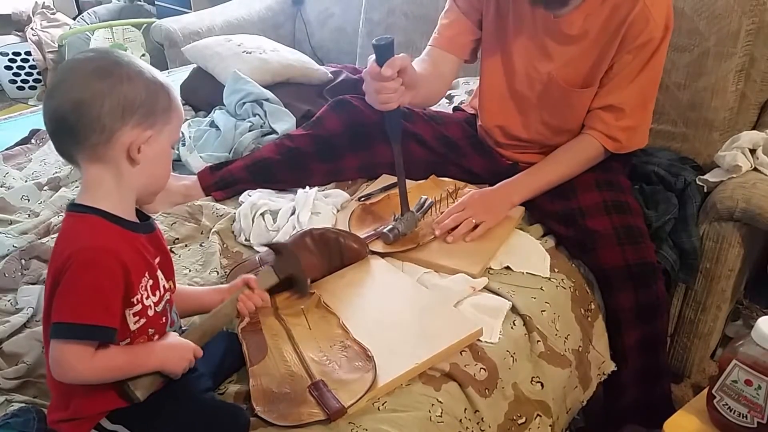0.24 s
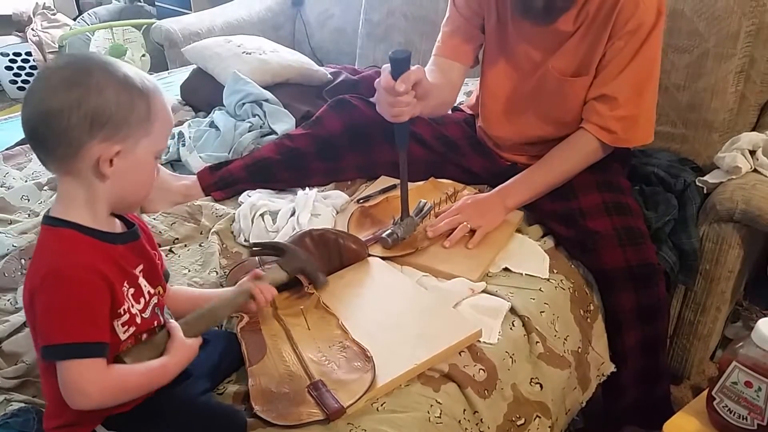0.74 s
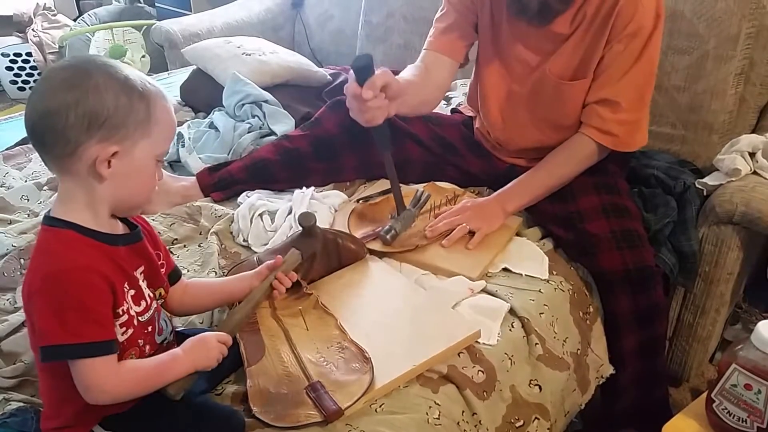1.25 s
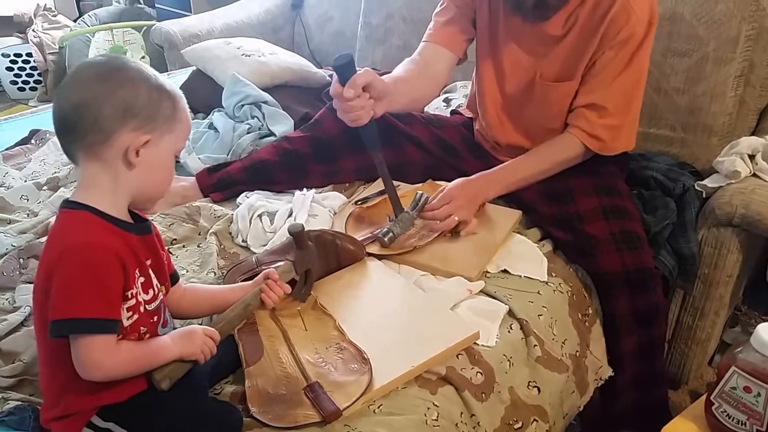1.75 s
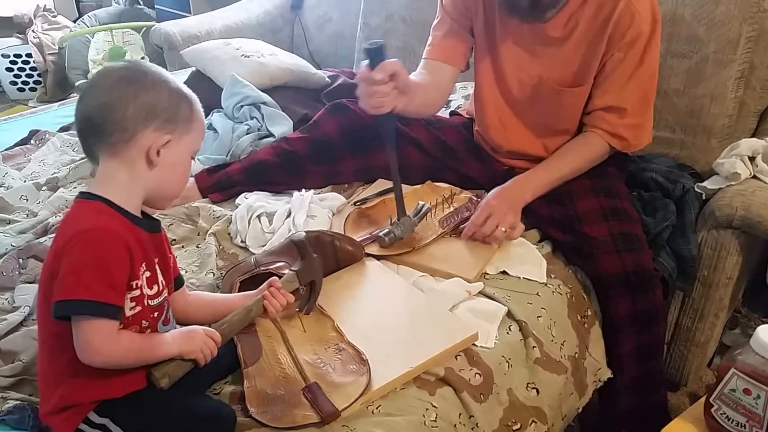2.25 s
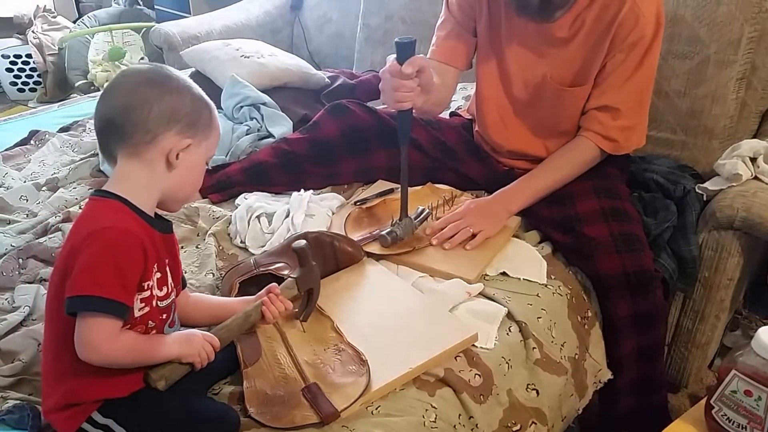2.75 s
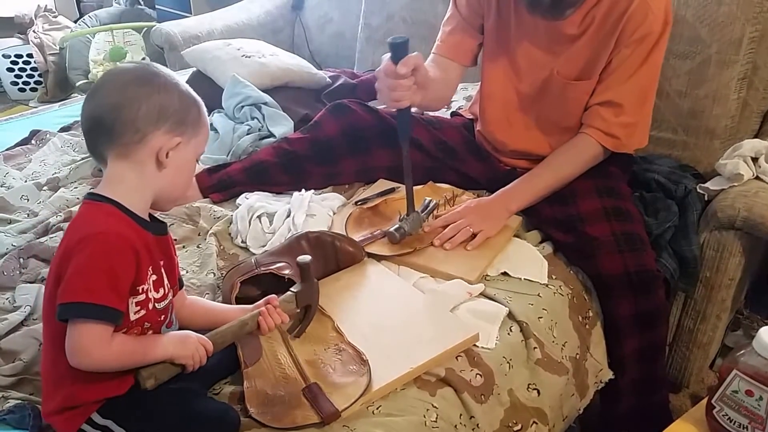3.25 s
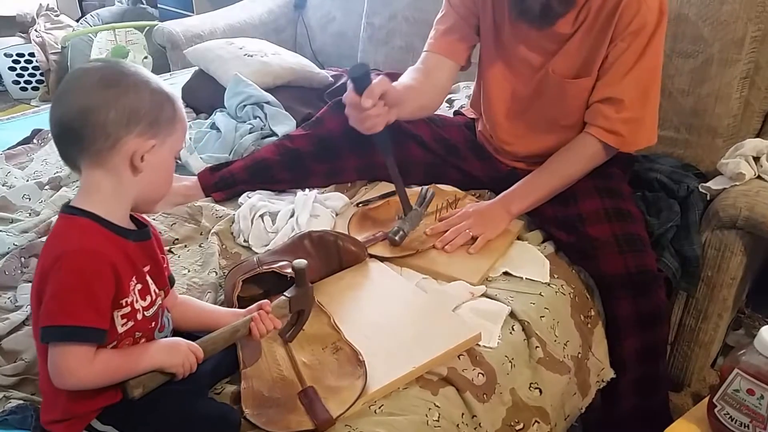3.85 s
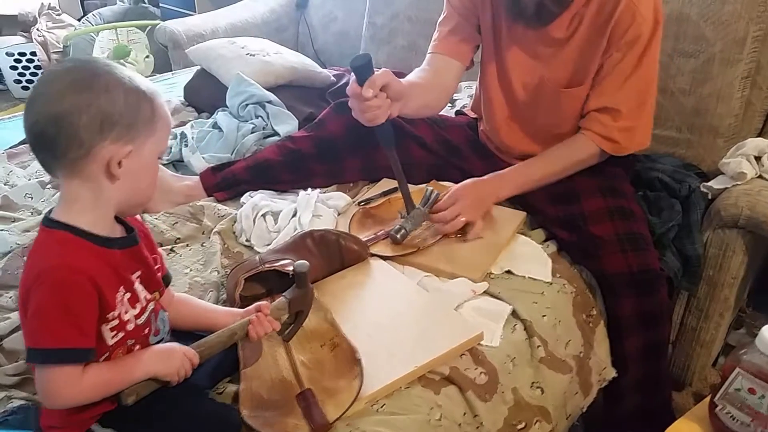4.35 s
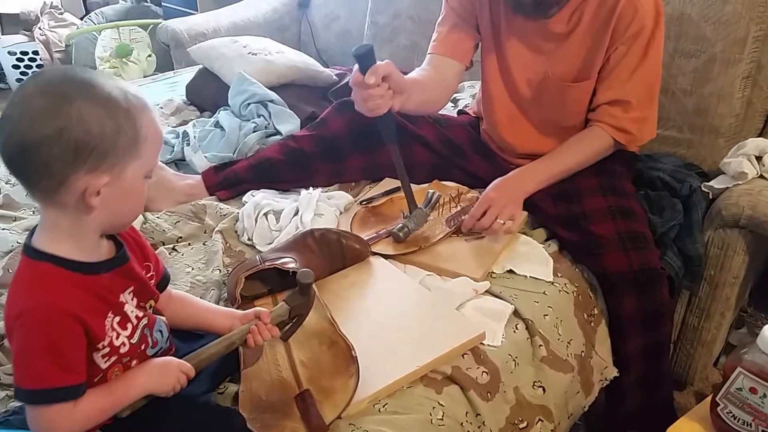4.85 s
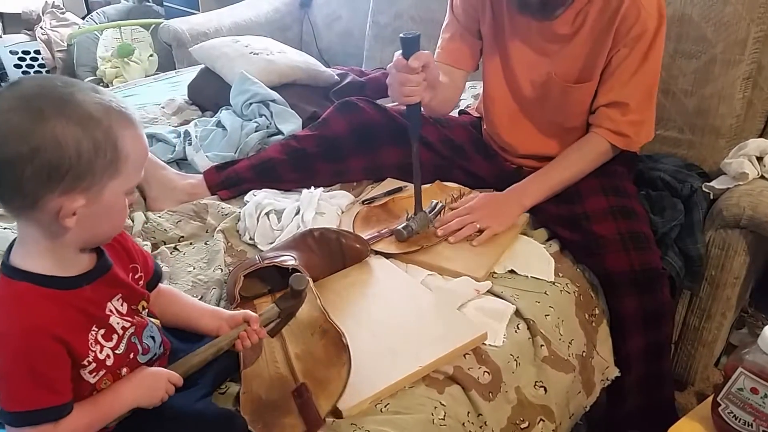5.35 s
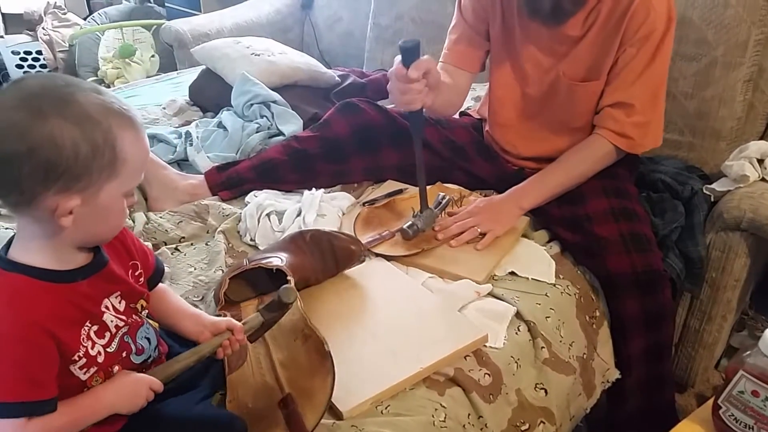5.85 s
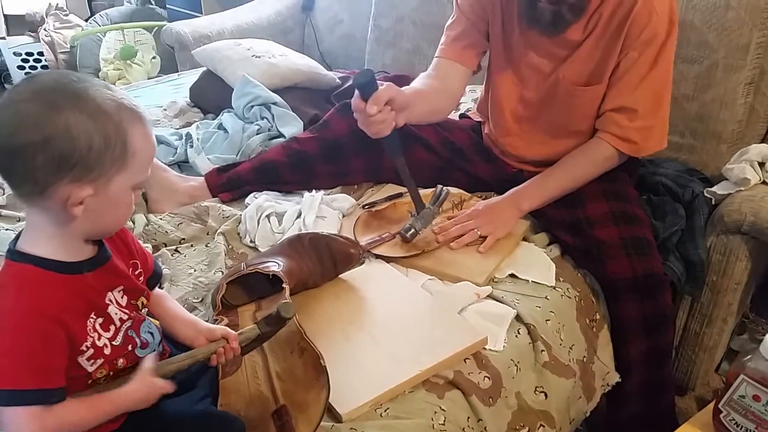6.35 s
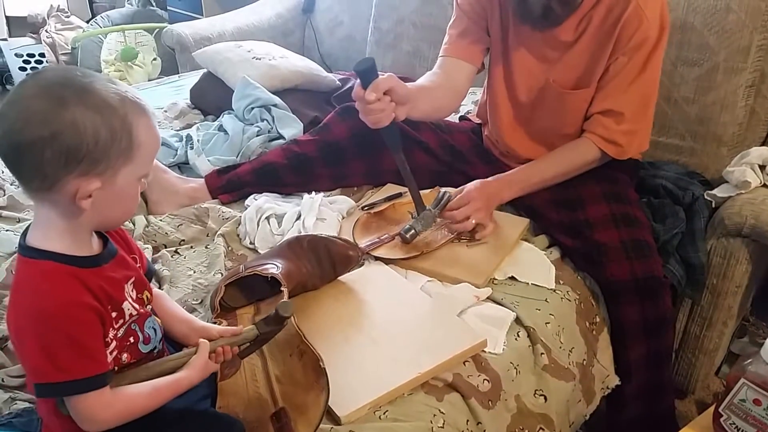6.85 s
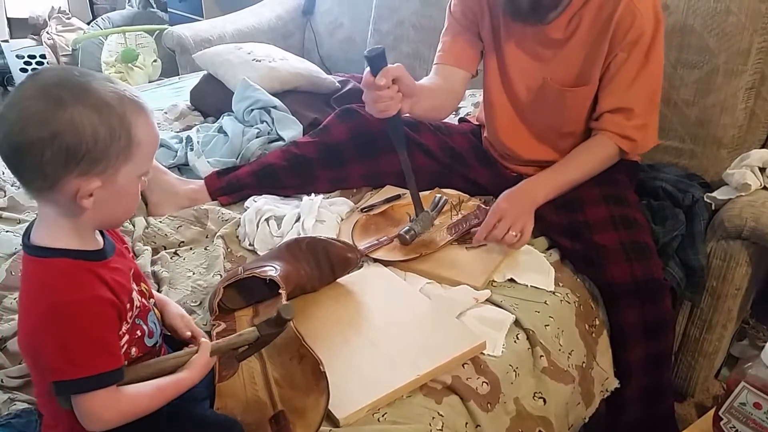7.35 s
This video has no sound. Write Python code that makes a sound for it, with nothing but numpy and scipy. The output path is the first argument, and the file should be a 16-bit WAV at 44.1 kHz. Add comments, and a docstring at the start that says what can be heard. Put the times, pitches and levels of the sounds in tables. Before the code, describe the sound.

Close handheld pickup of quiet leatherwork indoors: one heavy, muffled knock first, then scattered lighter hammer taps with woody resonance. A loud microphone bump comes early, and more cluster midway. Hands scrape leather, nails jingle brightly, and a couple of dull knocks come near six seconds before a last tiny clink. Low appliance hum, soft room noise and left-sided hiss persist.

```python
"""In a small, softly furnished room, a hammer works leather over a wooden board that lies on a cushion.
Irregular knocks thud and ring the board as decaying tones; steel chinks and loose nails jingle as high tones.
Hands slide over the leather as grainy noise, and the dragged hammer creaks by keeping the board ringing.
The hand-held phone is bumped, which makes filtered pressure steps; two appliance motors hum and beat.
Soft noise fills the air, a low drone comes and goes, and the left microphone hisses and whistles."""
import sys
import numpy as np
from scipy import signal
from scipy.fft import rfft, irfft, next_fast_len
from scipy.io import wavfile
from scipy.ndimage import uniform_filter1d

SR = 44100
rng = np.random.default_rng(int(sys.argv[2]) if len(sys.argv) > 2 else 0)


def master_out(mix):
    """Clip the mix to full scale and print it as 16-bit PCM to the path in sys.argv[1]."""
    frames = np.transpose(np.atleast_2d(mix))
    ceiling = np.clip(frames, -1, 1)
    pcm = np.round(ceiling * 32767).astype(np.int16)
    wavfile.write(sys.argv[1], SR, pcm)


N = 335601
T = np.arange(N) / SR
RING_T = T[:SR // 2]  # time within one short sound [s]


def undb(db):
    """Turn decibels into gain."""
    return 10 ** (np.asarray(db) / 20)


def curve(rows):
    """Join the rows of a timed table by straight lines, giving each column at every sample."""
    s, *columns = np.transpose(rows)
    return [np.interp(T, s, c) for c in columns]


def swells(rows):
    """Make a smooth rise and fall of gain for each (centre [s], length [s], level [dB])."""
    return sum(undb(db) * np.exp(-(2 * (T - s) / length) ** 2) for s, length, db in rows)


def unit(x):
    """Scale to rms 1."""
    return x / np.sqrt(np.mean(x ** 2))


def burst(x):
    """Scale a short sound to the total energy of 20 ms at rms 1."""
    return x / np.sqrt(np.sum(x ** 2) / (SR / 50))


def colour(x, points):
    """Shape a sound by (frequency [Hz], level [dB]) points, falling away beyond both ends; rms 1."""
    hz, db = np.transpose(points)
    octave = np.log2(np.fft.rfftfreq(len(x), 1 / SR) + 1)
    point_octave = np.log2(hz)
    beyond = np.abs(octave - np.clip(octave, point_octave[0], point_octave[-1]))
    shape_db = np.interp(octave, point_octave, db) - 36 * beyond  # falls 36 dB per octave outside
    return unit(irfft(rfft(x) * undb(shape_db), len(x)))


def noise(points, size=N):
    """Make smooth coloured noise."""
    return colour(rng.standard_normal(next_fast_len(size, True)), points)[:size]


def grains(points, spread_db):
    """Make coloured noise from dense tiny slips of very uneven size."""
    size = next_fast_len(N, True)
    slips = rng.standard_normal(size) * (rng.random(size) < .1)  # about one sample in ten slips
    sizes = undb(spread_db * np.minimum(rng.exponential(size=size), 5))
    return colour(slips * sizes, points)[:N]


def walk(rate):
    """Wander slowly at random, with `rate` fresh values a second, smoothed; rms 1."""
    k = int(SR / rate)
    held = np.repeat(rng.standard_normal(N // k + 1), k)
    return unit(uniform_filter1d(held, k)[:N])


def fade(t60):
    """Die away exponentially, by 60 dB in t60 seconds."""
    return np.exp(-np.log(1000) * RING_T / max(t60, 1e-3))


def ring(modes):
    """Ring decaying tones with chance weights, as blows land elsewhere; short ones stray more in pitch."""
    out = 0
    for hz, db, t60 in modes:
        weight_db, stray = rng.standard_normal(2)
        tone = np.sin(2 * np.pi * (hz + .5 * stray / t60) * RING_T)
        out = out + undb(db + weight_db) * fade(t60) * tone
    return out


def spray(points, t60, tail_db, tail_t60):
    """Make a noisy contact with a faint tail, drawn separately for the two channels."""
    shape = fade(t60) + undb(tail_db) * fade(tail_t60)
    return np.array([burst(noise(points, len(RING_T)) * shape) for _ in range(2)])


def rubbed(slips, modes):
    """Keep modes ringing by a stream of slips, at about the level of the slips."""
    response = ring(modes)
    return signal.fftconvolve(slips, response / np.linalg.norm(response))[:N]


def pan(left_db):
    """Give the two channel gains; left_db is how much louder the left is than the right."""
    return undb(np.array([[left_db], [-left_db]]) / 2)


def add(out, s, x):
    """Mix x in at time s."""
    i = int(s * SR)
    out[:, i:i + x.shape[-1]] += x[..., :N - i]


# colour of the low room noise: (frequency [Hz], level [dB])
AIR_COLOUR = [(20, -16.5), (50, 1), (90, 0), (150, -5), (230, -4.5), (340, -12), (480, -13), (800, -23),
              (1500, -30)]
# strength of each layer of low room noise: (time [s], level [dB])
AIR_LEVEL = [(0.0, -59), (2.48, -68), (3.62, -62.5), (7.61, -63.5)]


def air():
    """Low room noise is partly the same in both channels and partly separate."""
    shared = noise(AIR_COLOUR)
    separate = np.array([noise(AIR_COLOUR), noise(AIR_COLOUR)])
    return undb(curve(AIR_LEVEL)[0]) * (shared + 1.08 * separate)


# colour of the soft low drone: (frequency [Hz], level [dB])
DRONE_COLOUR = [(260, -9.5), (340, 4.5), (460, -12.5)]
# when the drone swells: (centre time [s], length [s], level [dB])
DRONE_SWELLS = [(0.739, 0.95, -61), (5.614, 3.1, -65)]


def drone():
    """Band-shaped low noise comes and goes as a soft drone."""
    return noise(DRONE_COLOUR) * swells(DRONE_SWELLS)


# colour of the narrow hiss in the left microphone: (frequency [Hz], level [dB])
HISS_COLOUR = [(2800, -28.5), (3500, -19), (4000, -6.5), (4450, 1), (4900, -3), (5300, -6.5), (5750, -13),
               (6200, -25), (7000, -45.5)]


def left_hiss():
    """The left microphone has a narrow hiss and a whistle that wavers as slow noise moves its tone."""
    whistle_hz = 4452
    slow = signal.butter(2, 24, fs=SR, output="sos")
    drift = signal.sosfilt(slow, rng.standard_normal((2, N)))
    carrier = np.exp(2j * np.pi * whistle_hz * T)
    whistle = unit(np.real((drift[0] + 1j * drift[1]) * carrier))
    hiss = undb(-49.5) * noise(HISS_COLOUR) + undb(-49.5) * whistle
    return np.array([[1], [0]]) * hiss


MOTOR_HZ, BEAT_HZ, IN_STEP_S = 58.8, .845, 1.08  # slow motor, extra speed of the other, aligned at [s]
SLOW_MOTOR_DB, FAST_MOTOR_DB, OCTAVE_DB = -54, -58, -16.5  # the octave is relative to its motor
SWELL_S, SWELL_LENGTH_S, SWELL_DB = 7.08, 0.62, -51  # one swell of the slow motor's octave


def hum():
    """Two motors at nearly the same speed drift in and out of step; each has a weak octave and wavers."""
    slow, fast = (2 * np.pi * hz * (T - IN_STEP_S) + 0.3 * walk(1.7)
                  for hz in (MOTOR_HZ, MOTOR_HZ + BEAT_HZ))
    motors = 0
    for db, turn in [(SLOW_MOTOR_DB, slow), (FAST_MOTOR_DB, fast)]:
        motors = motors + undb(db) * (np.cos(turn) + undb(OCTAVE_DB) * np.cos(2 * turn))
    octave_swell = swells([(SWELL_S, SWELL_LENGTH_S, SWELL_DB)]) * np.cos(2 * slow)
    return motors + octave_swell


def background():
    """Hum, low noise and drone sound in both channels; hiss and whistle on the left."""
    return hum() + air() + drone() + left_hiss()


# fingers pressing on a microphone port:
# (time [s], pressure step [full scale, before the bass cut], rise [s], share on the right [0-1])
BUMPS = [(1.556, 0.84, 0.00039, 1), (4.4464, -0.11, 0.00057, 0.1), (4.4502, 0.36, 0.00059, 0),
         (4.4689, -0.31, 0.001, 0), (4.4737, 0.31, 0.001, 0.06), (4.49, 0.15, 0.00063, 0.07)]
# colour of a snapping contact, for bumps and knocks: (frequency [Hz], level [dB])
SNAP_COLOUR = [(700, -1), (2200, 13), (3300, 6), (5000, 7), (6400, -0.5), (7500, -38), (9500, -26)]
# colour of fine treble, for bumps, hands, nails and knocks: (frequency [Hz], level [dB])
FINE_COLOUR = [(7000, -24.5), (9000, -21), (10000, -13), (11800, 0.5), (13400, -4), (14250, -3),
               (14700, -11), (15800, -10)]
CASE_TICK_DB = -54  # tick for a press of full scale per ms


def bumps():
    """A finger steps the port pressure; the bass cut makes it a pop, and a quick press ticks the case."""
    steps, ticks = np.zeros((2, N)), np.zeros((2, N))
    for s, step, rise, right in BUMPS:
        share = np.clip(right, 0, 1)
        port = np.array([[1 - share], [share]])
        steps += port * step * (1 + np.tanh(2 * (T - s) / rise)) / 2
        speed = abs(step) / (1000 * rise)  # full scale per ms
        snap = spray(SNAP_COLOUR, t60=0.002, tail_db=-40, tail_t60=0.042)
        fine = spray(FINE_COLOUR, t60=0.0054, tail_db=-51, tail_t60=0.022)
        # the tick grows with the square of the speed
        add(ticks, s, port * undb(CASE_TICK_DB) * speed ** 2 * (snap + undb(-10.5) * fine))
    cut_hz, damping = 92, 1.2
    w = 2 * np.pi * cut_hz
    bass_cut = signal.bilinear([1, 0, 0], [1, damping * w, w * w], SR)
    return signal.lfilter(*bass_cut, steps) + ticks


# base level of the restless cloth and leather: (time [s], level [dB])
RUSTLE_LEVEL = [(0.0, -68.5), (0.82, -73.5), (1.29, -65), (1.59, -76.5), (2.18, -79), (3.14, -71.5),
                (3.37, -70.5), (4.01, -71.5), (5.77, -69), (6.0, -75), (6.25, -73), (7.61, -75.5)]
# colour of the body of the rustle: (frequency [Hz], level [dB])
RUB_COLOUR = [(300, 11), (600, 2.5), (1000, 1), (1600, -5), (2300, -2), (3200, -4.5), (4500, 2.5),
              (6000, -9), (7200, -31)]
RUB_DB, RUB_TREBLE_DB = 7, 4  # its body and treble, relative to the base level


def rustle():
    """Restless cloth and leather make a smooth bed of noise with treble hiss."""
    rub = undb(RUB_DB) * np.array([noise(RUB_COLOUR), noise(RUB_COLOUR)])
    fine = undb(RUB_TREBLE_DB) * np.array([noise(FINE_COLOUR), noise(FINE_COLOUR)])
    return undb(curve(RUSTLE_LEVEL)[0]) * (rub + pan(-4.5) * fine)


# a hand slides over the leather: (centre time [s], length [s], level before the catching [dB])
SLIDES = [(1.1, 0.1, -39.5), (1.242, 0.03, -49), (2.475, 0.14, -50.5), (3.15, 0.079, -56),
          (3.525, 0.064, -57), (3.66, 0.33, -56), (3.86, 0.085, -39), (4.472, 0.055, -33.5),
          (5.035, 0.098, -36), (5.13, 0.14, -47.5)]
# fingers stir the loose nails: (centre time [s], length [s], level before the catching [dB])
STIRS = [(3.545, 0.04, -46), (4.66, 0.093, -40.5), (6.31, 0.26, -53), (7.05, 0.22, -48)]
# colour of scuffing, for slides and creaks: (frequency [Hz], level [dB])
SCUFF_COLOUR = [(400, 0.5), (1050, -8), (1400, -1), (1750, -1), (2300, 1.5), (3100, -3), (5000, 5.5),
                (7000, -35)]
# high bending tones of the board, for slides and knocks:
# (frequency [Hz], level [dB], time to fade by 60 dB [s])
HIGH_BEND = [(822, -3, .06), (935, -7, .035), (1007, 0, .06), (1112, 0, .058), (1190, -5, .03),
             (1300, -4, .035), (1443, -8, .045)]
SLIDE_TREBLE_DB, SLIDE_BOARD_DB = -11.5, -12  # fine scratch and board ringing with every slide


def handling():
    """Over the rustle, hands slide on leather and stir nails in grains; slides also ring the board."""
    leather = swells(SLIDES)
    scrape = swells(STIRS) + undb(SLIDE_TREBLE_DB) * leather
    catch = undb(4.63 * walk(70) - 11.5)  # the surfaces catch and let go
    low = np.array([grains(SCUFF_COLOUR, spread_db=4.0) for _ in range(2)])
    high = np.array([grains(FINE_COLOUR, spread_db=6) for _ in range(2)])
    board_slips = catch * leather * grains(SCUFF_COLOUR, spread_db=1.5)
    board = undb(SLIDE_BOARD_DB) * rubbed(board_slips, HIGH_BEND)
    return rustle() + board + catch * (leather * low + pan(-6.5) * scrape * high)


# tones of the steel hammer head: (frequency [Hz], level [dB], time to fade by 60 dB when free [s])
STEEL = [(7850, -19, .5), (10160, -18, .3), (12290, -9, .4), (12510, 0, .26), (13110, -13, .3),
         (15680, -16, .27)]
# touches on the head: (time [s], level before panning [dB], multiple of the free ring time,
# brightness [dB per kHz])
CHINKS = [(0.152, -44, 1.5, -0.5), (2.183, -59.5, 2.1, 2.5), (2.896, -45, 0.83, 2), (4.955, -39.5, 0.39, 5),
          (4.971, -38.5, 0.13, 2)]


def hammer_head():
    """The steel head sings when touched; each touch changes how long and how brightly."""
    head = np.zeros((2, N))
    middle_hz = 12500  # brightness tilts the tones about this pitch
    for s, db, free, bright in CHINKS:
        modes = [(hz, mode_db + bright * (hz - middle_hz) / 1000, t60 * free)
                 for hz, mode_db, t60 in STEEL]
        add(head, s, undb(db) * ring(modes))
    return pan(-7.5) * head


# loose nails knocked together: (time [s], level before the overall nail gain [dB], pitch [Hz])
NAILS = [(2.38, -54, 11750), (2.415, -35.5, 11600), (5.0127, -24.5, 12200), (5.0155, -26, 11500),
         (5.0235, -21, 12200), (5.025, -26.5, 11460), (5.069, -47, 11900), (6.334, -46, 11900),
         (6.407, -43, 11720), (6.992, -44, 11800), (7.598, -25, 11800)]
NAIL_T60_S = 0.16


def loose_nails():
    """Each nail clicks and rings with two close tones that beat."""
    nails = np.zeros((2, N))
    for s, db, hz in NAILS:
        pair = ring([(hz, 0, NAIL_T60_S), (hz * 1.007, -8, NAIL_T60_S)])
        click = undb(-34) * noise(FINE_COLOUR, len(RING_T)) * fade(0.036)
        add(nails, s, undb(db) * (pair + click))
    return pan(-14) * undb(-9.0) * nails


def metal():
    """Hammer head and nails are small parts, which radiate no lows."""
    high_pass = signal.butter(2, 7000, "high", fs=SR, output="sos")
    return signal.sosfilt(high_pass, hammer_head() + loose_nails())


# the hammer drags on the leather: (centre time [s], length [s],
# level in the lowest bending tones [dB], level in the stiff tones [dB])
CREAKS = [(1.086, 0.029, -46.5, -73), (2.007, 0.013, -55.5, -64), (3.272, 0.054, -53, -58.5),
          (3.35, 0.016, -41, -62), (3.836, 0.021, -50, -48), (4.97, 0.037, -50, -70)]
# low bending tones of the board, for creaks and knocks:
# (frequency [Hz], level [dB], time to fade by 60 dB [s])
LOW_BEND = [(452, 0, .085), (505, -4, .05), (597, -3, .06), (690, -2, .065), (760, -6, .045)]
# stiff upper tones of the board, for creaks and knocks:
# (frequency [Hz], level [dB], time to fade by 60 dB [s])
CRACK = [(1850, -3, .04), (2130, 0, .055), (2450, -5, .04), (2780, -6, .04), (3140, -5, .045)]


def creak():
    """Dense slips under the dragged hammer keep the board's tones ringing."""
    slips = grains(SCUFF_COLOUR, spread_db=3)
    low = swells([(s, length, db) for s, length, db, _ in CREAKS])
    stiff = swells([(s, length, db) for s, length, _, db in CREAKS])
    return rubbed(low * slips, LOW_BEND[:3]) + rubbed(stiff * slips, CRACK)


# early echoes from the nearest surfaces: (delay [s], left gain [factor], right gain [factor])
ECHOES = [(.0057, 0.34, 0.56), (0.0125, .2, 0.25), (0.023, .14, .12)]


def echoes(x):
    """A sharp contact is heard again off the nearest surfaces."""
    out = x.copy()
    for delay, *gains in ECHOES:
        add(out, delay, np.array(gains)[:, None] * x)
    return out


# blows on the board, and a few very bright clicks of metal on it: (time [s], force [dB], hardness of the
# contact [dB per octave], distance from the middle along the board [0-1], and across it [0-1])
KNOCKS_AND_CLICKS = [(0.152, -16.5, -0.97, 0.22, 0.04), (0.168, -28, 0.7, 0.26, 0), (0.255, -34.5, -0.36, 0.31, .11),
                     (1.07, -41, 2.27, 0.1, 0.05), (1.11, -32, -0.75, 0, 0.3), (1.996, -37, -0.85, 0.15, 0.06),
                     (2.06, -64.5, 3.5, 0.6, .08), (2.128, -48, 0.2, 0.16, 0.04), (2.38, -58.5, 4.5, 0, 0),
                     (3.252, -50.5, 2.6, .4, 0.14), (3.298, -56, 5, 0, 0), (3.342, -29.5, 0.32, 0.16, 0.1),
                     (3.624, -48, 0.5, 0.32, 0.1), (3.822, -33.5, -2, 0.22, 0.36), (3.827, -31.5, 1.5, 0.5, 0.45),
                     (4.269, -50.5, 2.3, 0.37, 0.29), (4.958, -50.5, 2.5, 1, 0.15), (4.974, -50, 2, 0.6, 0.6),
                     (5.017, -54, 7.5, 0, 0), (5.324, -48.5, 2.5, .2, 0.23), (6.155, -37.5, 2, .14, 0.28),
                     (6.208, -32.5, -2.5, 0.3, 0.92), (6.305, -54.5, -.5, 0.87, 0.4), (7.592, -54, 7, 0, 0.02)]
# the board bouncing on its cushion: (frequency [Hz], level [dB], time to fade by 60 dB [s])
THUD = [(143, 0, .065), (200, -2, .06), (254, -10, .1), (343, -12, .1)]
# levels relative to the force of the blow; the bends are for a blow at the very edge
THUD_DB, SHOVE_DB, LOW_BEND_DB, HIGH_BEND_DB = -3.5, -5.5, -1, 1
CRACK_DB, SNAP_DB, TICK_DB = -25, -16.5, -24.5
EDGE_THUD_DB = -19.5  # a blow at the side edge bounces the board less


def knocks():
    """A blow shoves, bends and cracks the board; hard is brighter, off-centre bends it more."""
    body, contact = np.zeros((2, N)), np.zeros((2, N))
    # leather spreads the force over a smooth pulse; the shoved board radiates its curvature
    u = (RING_T - .0042) / 0.0016
    shove = burst((1 - 2 * u ** 2) * np.exp(-u ** 2))
    octaves = np.log2(np.array([500, 1000, 2300, 12000]) / 200)  # height of each register above 200 Hz
    for s, db, hardness, along, across in KNOCKS_AND_CLICKS:
        along, across = np.clip([along, across], 0, 1)
        low, high, crack, treble = undb(hardness * octaves)  # gain of each register from hardness
        bounce = burst(ring(THUD) * (1 - np.exp(-RING_T / 0.0099)))  # soft start
        thud = -undb(THUD_DB + EDGE_THUD_DB * across) * bounce
        low_bend = along * low * undb(LOW_BEND_DB) * burst(ring(LOW_BEND))
        high_bend = across * high * undb(HIGH_BEND_DB) * burst(ring(HIGH_BEND))
        stiff = crack * undb(CRACK_DB) * burst(ring(CRACK))
        snap = crack * undb(SNAP_DB) * spray(SNAP_COLOUR, t60=0.024, tail_db=-7.0, tail_t60=0.04)
        tick = treble * undb(TICK_DB) * spray(FINE_COLOUR, t60=0.011, tail_db=-22, tail_t60=0.018)
        add(body, s + 0.001269, undb(db) * (thud + low_bend + high_bend + stiff))
        add(contact, s + 0.00039, pan(-3.1) * undb(db + SHOVE_DB) * shove)
        add(contact, s + .0019, undb(db) * (snap + pan(-3.0) * tick))
    return body + echoes(contact)


def room(x, t60_low, t60_high, wet_db):
    """Furnishings swallow a short diffuse tail; its lows use the same noise in both channels."""
    chance = rng.standard_normal((3, len(RING_T)))
    low = signal.sosfilt(signal.butter(2, 1500, fs=SR, output="sos"), chance[0])
    high = signal.sosfilt(signal.butter(2, 1500, "high", fs=SR, output="sos"), chance[1:])
    build_up = np.clip(RING_T / 0.016, 0, 1) ** 2
    tail = (low * fade(t60_low) + undb(-0.5) * high * fade(t60_high)) * build_up
    return x + undb(wet_db) * signal.fftconvolve(x, tail, axes=1)[:, :N]


def scene():
    """Join the background, the bumps and hands near the phone, and the work heard in its room."""
    work = room(knocks() + creak() + metal(), t60_low=0.27, t60_high=0.33, wet_db=-34.5)
    return background() + bumps() + handling() + work


def record(dry):
    """The phone has a deep dip in the upper treble and cuts everything above its top frequency."""
    top_hz = 15900
    dip = signal.butter(1, [7300, 9400], "bandstop", fs=SR, output="sos")
    top_cut = signal.ellip(10, .2, 80, top_hz, fs=SR, output="sos")
    return signal.sosfilt(top_cut, signal.sosfilt(dip, dry))


dry = scene()
out = record(dry)
master_out(out)
```